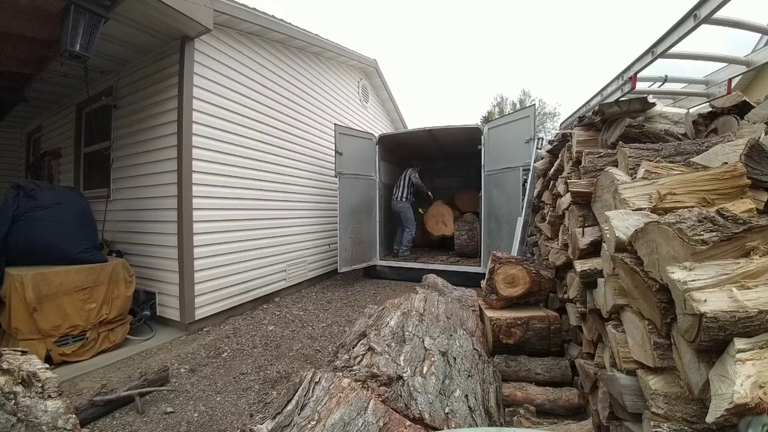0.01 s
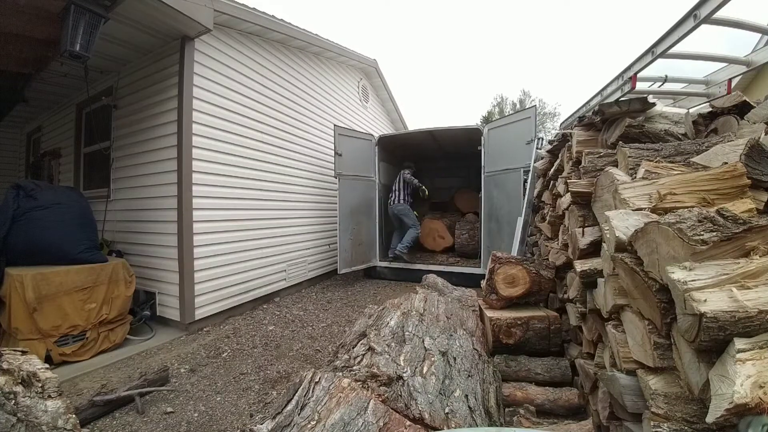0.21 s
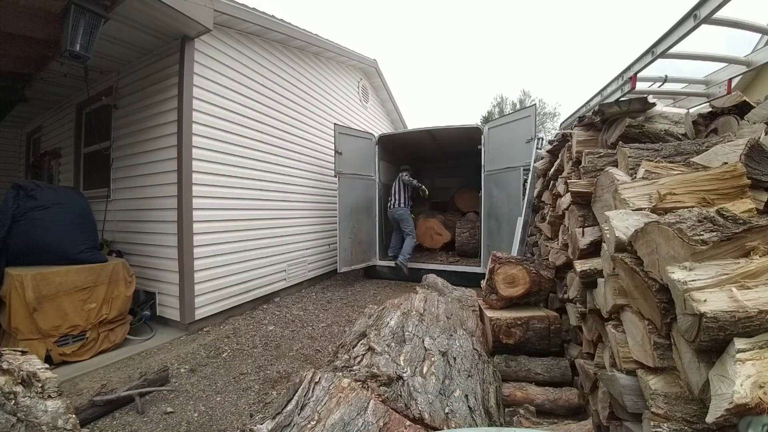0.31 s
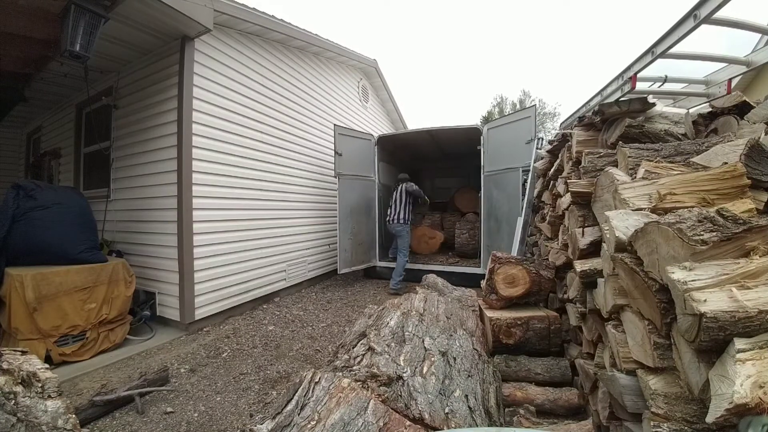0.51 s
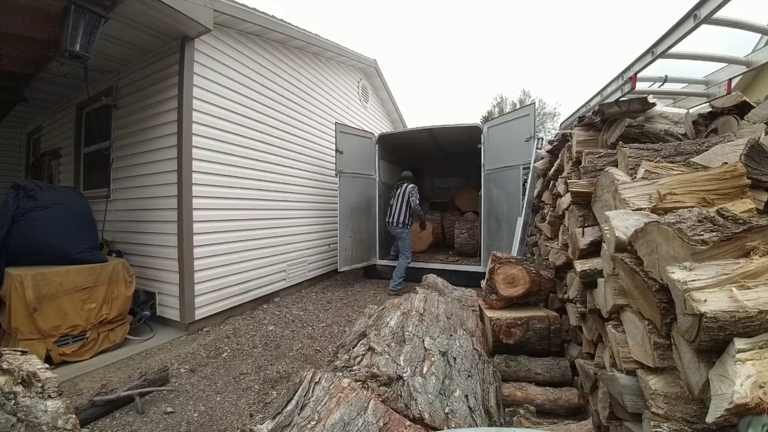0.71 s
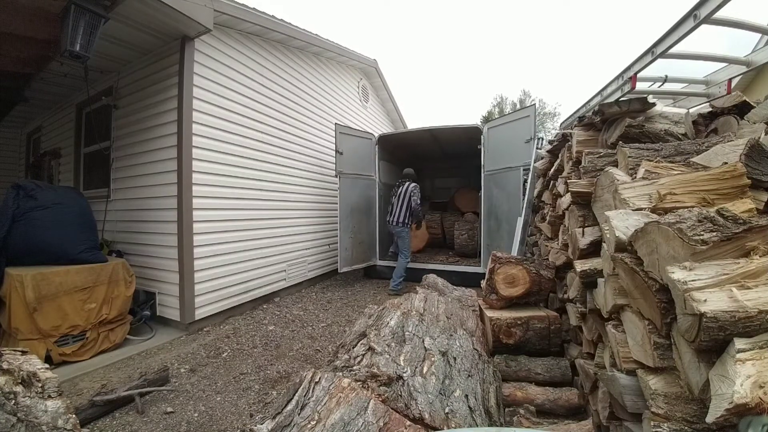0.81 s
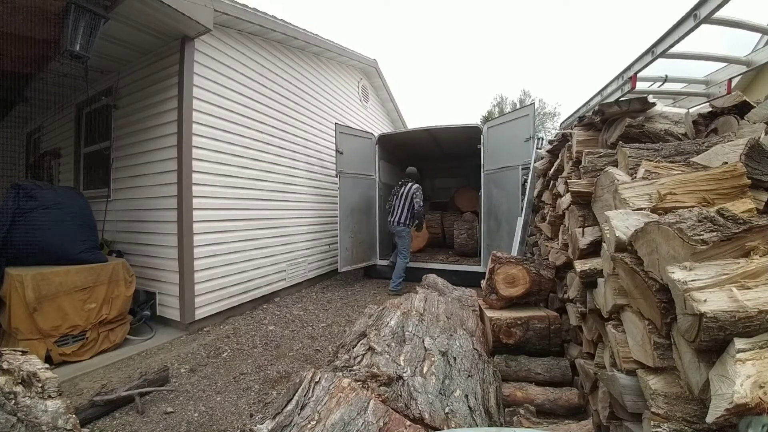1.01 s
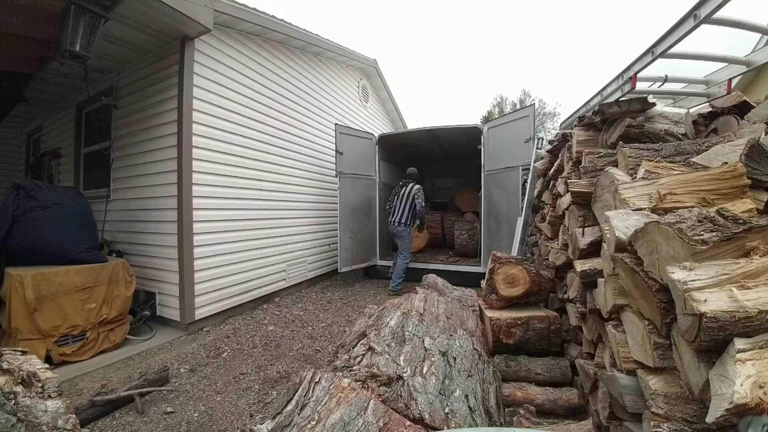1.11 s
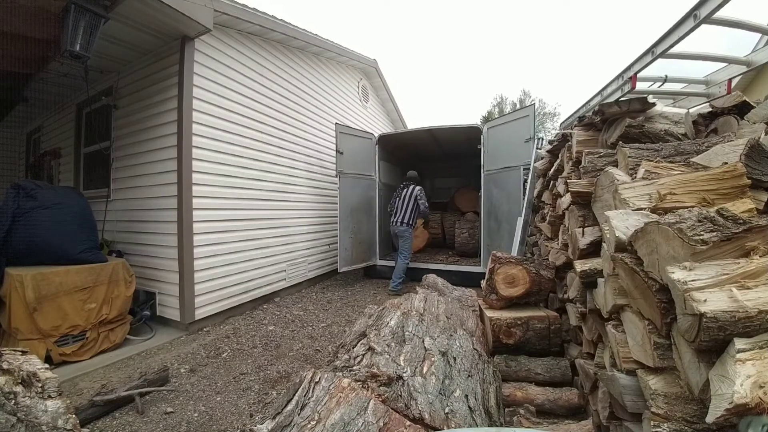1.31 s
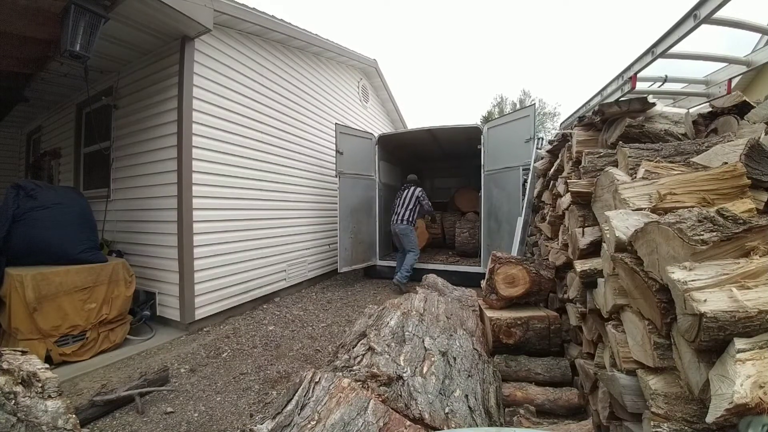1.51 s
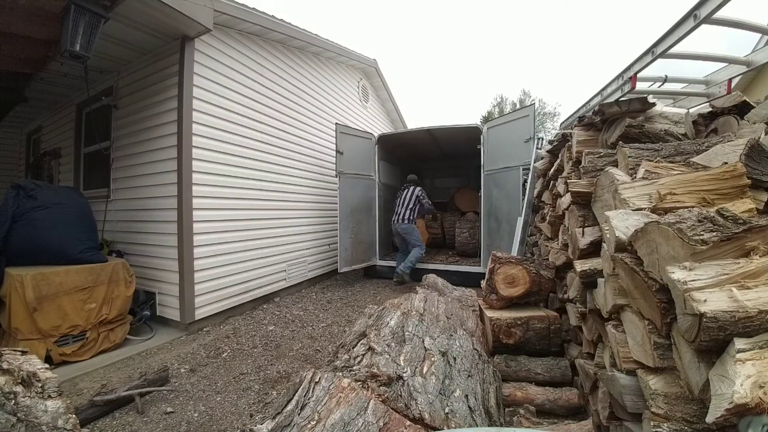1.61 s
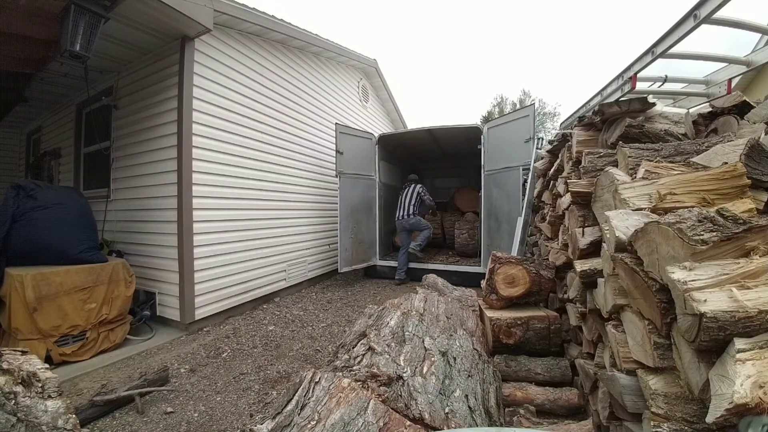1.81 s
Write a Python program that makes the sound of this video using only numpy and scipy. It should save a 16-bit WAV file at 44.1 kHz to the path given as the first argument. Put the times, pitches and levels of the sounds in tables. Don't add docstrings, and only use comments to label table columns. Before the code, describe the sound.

Heavy log knocks and scrapes, thuds onto an echoing trailer floor, rumbles, thuds once more, quiets

```python
import sys
import numpy as np
from scipy import signal
from scipy.fft import rfft, irfft, next_fast_len
from scipy.io import wavfile

SR = 44100
rng = np.random.default_rng(int(sys.argv[2]) if len(sys.argv) > 2 else 0)


def boost_factor(decibels):
    exponent = np.asarray(decibels, float) / 20
    return 10 ** exponent


def digitize_waveform(pressure):
    field = np.atleast_2d(pressure).T
    bounded = np.clip(field, -1, 1)
    quanta = np.round(bounded * 32767).astype(np.int16)
    wavfile.write(sys.argv[1], SR, quanta)


N = 81585

# (frequency [Hz], width [Hz], level [dB])
BODY_MODES = [(176, 42, -11.5), (207, 34, 11), (294, 70, -3.5), (393.3, 23.4, 6), (431, 30, -19.5),
              (637.5, 22, 0.5), (797, 42, -17.5), (915, 18.3, -5), (1200, 23, -41.5), (1375, 12, -21.5),
              (1492, 25, -24.5), (1814, 10, -14), (1934, 19, -14.5), (2570, 18, -58)]


def rms_one(x):
    return x / np.sqrt(np.mean(x ** 2) + 1e-20)


def butter(x, order, hz, kind):
    return signal.sosfilt(signal.butter(order, hz, kind, fs=SR, output="sos"), x)


def colour(x, points):
    edges = 32 * 2 ** np.arange(0, 9.3, 0.5)
    hz, db = np.transpose(points)
    total = 0
    for k, (lo, hi) in enumerate(zip(edges, edges[1:])):
        log_centre = np.log(lo * hi) / 2
        gain = boost_factor(np.interp(log_centre, np.log(hz), db))
        total = total + (-1) ** k * gain * butter(x, 2, [lo, hi], "band")
    return rms_one(total)


def resonance(x, hz, width):
    r = np.exp(-np.pi * width / SR)
    gain = (1 - r * r) / 2
    return signal.lfilter([gain, 0, -gain], [1, -2 * r * np.cos(2 * np.pi * hz / SR), r * r], x)


def double_resonance(x, hz, width):
    return resonance(resonance(x, hz, width), hz, width)


def grains(rate, spread_db):
    size = boost_factor(spread_db * np.minimum(rng.exponential(1, N), 5)) * rng.choice([-1, 1], N)
    return size * (rng.random(N) < rate / SR) + 1e-18


def since(s):
    return np.maximum(np.arange(N) / SR - s, 0)


def burst(s, rise, t60):
    t = since(s)
    return (1 - np.exp(-t / abs(rise))) * boost_factor(-60 * t / abs(t60))


def body(x):
    modal_db = -7
    rings = 0
    for k, (hz, width, db) in enumerate(BODY_MODES):
        rings = rings + (-1) ** k * boost_factor(db / 2) * resonance(x, hz, max(width, 10))
    direct = butter(x, 1, 3000, "low")
    return rms_one(rms_one(direct) + boost_factor(modal_db) * rms_one(rings))


def taps(rows, offset_db, cycles):
    out, t = np.zeros(N + 4000), np.arange(4000) / SR
    for s, db, hz in rows:
        start = int(s * SR)
        ring = np.sin(2 * np.pi * hz * t) * np.exp(-t * hz / cycles)
        out[start:start + len(t)] += boost_factor(db + offset_db) * ring
    return out[:N]


def background():
    # (frequency [Hz], level [dB per Hz])
    air_spectrum = [(35, -27), (60, 11.5), (180, -18.5), (536, -22.5), (1800, -27), (2610, -29.5),
                    (3070, -29.5), (6040, -33), (15700, -39)]
    air_db, hum_db, hum_hz, hum_width_hz = -45.5, -38.5, 52.4, 13
    tone = np.sqrt(2) * np.sin(2 * np.pi * hum_hz * np.arange(N) / SR)
    waver = rms_one(resonance(rng.standard_normal(N), hum_hz, hum_width_hz))
    air = butter(colour(rng.standard_normal(N), air_spectrum), 2, 80, "high")
    return boost_factor(air_db) * rms_one(air) + boost_factor(hum_db) * (tone + 0.11 * waver)


def box(x):
    t60_s, cut_hz = 0.44, 1250
    size = next_fast_len(N + SR)
    z = np.exp(-2j * np.pi * np.arange(size // 2 + 1) / size)
    dull, answer = np.exp(-2 * np.pi * cut_hz / SR), 0
    absorption = (1 - dull) / (1 - dull * z)
    for k, lag in enumerate([487, 613, 739, 857, 991, 1123, 1291, 1447]):
        loop = boost_factor(-60 * lag / SR / t60_s) * absorption * z ** lag
        answer = answer + (-1) ** k * loop / (1 - loop)
    return irfft(rfft(x, size) * answer, size)[:N]


def flecks(x):
    scrape_s, scrape_db, from_hz = 0.1075, -31, 6300
    fleck_db, fleck_gap_s = -8.5, 0.8
    t, late = np.arange(N) / SR, np.roll(x, 90)
    hiss = butter(rng.standard_normal(N), 6, from_hz, "high")
    out = boost_factor(scrape_db) * hiss * burst(scrape_s, 0.002, 0.07)
    for hz in np.sqrt(np.linspace(4500 ** 2, 15500 ** 2, num=12)):
        times = rng.uniform(0, 1, 6)[:, None] * 6 * fleck_gap_s
        windows = np.exp(-((t - times) / 0.011) ** 2).sum(axis=0)
        out = out + boost_factor(fleck_db) * double_resonance(late, hz, 900) * windows
    return out


def latch():
    # (frequency [Hz], width [Hz], level [dB])
    latch_modes = [
        (2470, 140, 0),
        (4150, 200, -6),
        (5400, 160, -5),
        (1150, 160, -4),
    ]
    first_s, period_s, t60_s = 1.291, 0.1035, 0.16
    first_db, loss_db = -50, 0.5
    source, rings, chatter = grains(2700, 2.2), 0, 0
    for hz, width, db in latch_modes:
        rings = rings + boost_factor(db) * rms_one(double_resonance(source, hz, width))
    for k in range(4):
        chatter = chatter + boost_factor(first_db - loss_db * k) * burst(first_s + period_s * k, 0.0034, t60_s)
    return rings * chatter


def scrapes():
    # (time [s], level [dB], rise [s], t60 [s])
    scrape_events = [(.0, -41.5, 0.00054, 1), (0.109, -29.5, 0.00071, 0.4), (0.166, -31.5, 0.0015, 0.54),
                     (0.21, -30, 0.0018, 0.45), (0.2846, -30.5, 0.001, 0.51), (0.373, -34, 0.01, 0.66),
                     (0.458, -33.5, 0.003, 0.32), (.505, -35.5, 0.014, 0.66), (0.651, -33.5, 0.012, 0.19),
                     (0.7507, -42.5, 0.00042, 0.21), (0.784, -34.5, 0.0029, 0.7),
                     (0.808, -37.5, 0.0027, 0.73), (.883, -35, 0.004, 0.94), (.918, -30.5, 0.0035, 0.26),
                     (.985, -35, 0.0084, 0.34), (1.068, -34, 0.005, 0.16), (1.135, -48.5, 0.0061, 1),
                     (1.292, -47.5, 0.0028, 0.14), (1.394, -47.5, 0.014, 0.37), (1.495, -49, 0.0064, 0.25),
                     (1.589, -49, 0.0065, 0.14)]
    # (frequency [Hz], level [dB per Hz])
    grit_spectrum = [(1760, -1), (3000, 7), (4070, -13.5), (4430, -4), (13000, -4.5), (15000, -8.5),
                     (15800, -10)]
    power = sum((boost_factor(db) * burst(s, rise, t60)) ** 2 for s, db, rise, t60 in scrape_events)
    grit = butter(colour(grains(7500, 1.5), grit_spectrum), 3, 2300, "high")
    return np.sqrt(power) * rms_one(grit)


def chafes():
    # (time [s], level [dB], centre [Hz], t60 [s])
    rasp_events = [(0.05, -30, 1600, 0.12), (0.057, -23, 940, 0.058), (0.074, -39, 910, 0.46),
                   (0.217, -28, 1480, 0.1), (.255, -25.5, 2980, 0.1), (0.27, -34.5, 2820, 0.27),
                   (.463, -40.5, 9000, 0.18), (0.798, -27.5, 1870, 0.18), (.808, -44, 5185, .12),
                   (0.894, -26.5, 2440, 0.13), (0.985, -36, 684, 0.19), (.99, -34, 731.5, 0.3),
                   (1.425, -47, 1300, 0.5), (1.45, -48, 1000, 0.22)]
    # (time [s], level [dB], centre [Hz], t60 [s])
    further_chafe_events = [(.113, -42, 14400, .4), (.214, -39, 5800, .15), (.288, -41, 10500, .2),
                            (.789, -42, 14500, .4), (.885, -46, 14500, .2), (1.003, -43, 10800, .35),
                            (1.07, -42, 10500, .25)]
    source, out = grains(8000, 0.79), 0
    for s, db, hz, t60 in [*rasp_events, *further_chafe_events]:
        width = 18.0 * np.sqrt(hz)
        out = out + boost_factor(db) * burst(s, 0.002, t60) * rms_one(double_resonance(source, hz, width))
    return out


def ticks():
    # (time [s], peak level [dB], centre [Hz])
    tick_events = [(0.052, -17, 1880), (0.06, -6.5, 1520), (0.061, -20, 925), (0.07, -13.5, 1040),
                   (0.084, -14, 1060), (0.111, -25, 2700), (0.164, -19, 2650), (0.194, -35, 2690),
                   (0.196, -17.5, 800), (0.288, -24, 851), (0.463, -30, 1100), (0.672, -15, 880),
                   (0.751, -16, 870), (0.806, -35, 2000), (0.895, -10, 1450), (0.992, -11, 720),
                   (0.996, -23, 760), (1.071, -10, 824), (1.25, -35, 853), (1.725, -50, 730)]
    return taps(tick_events, offset_db=-9, cycles=2.4)


def roll():
    # (time [s], level [dB])
    roll_weight = [(0.0, -42), (0.158, -49), (0.246, -26.5), (0.39, -25), (0.556, -29.5), (0.674, -39.5),
                   (0.906, -34), (1.04, -27.5), (1.092, -26), (1.257, -38), (1.664, -56), (1.85, -56.5)]
    # (frequency [Hz], level [dB per Hz])
    rumble_spectrum = [(53, -75), (90, -8), (147, -4), (323, -6), (535, -10), (842, -12.5), (963, -9.5),
                       (1850, -23), (5000, -34.5), (6500, -68), (11000, -120)]
    rumble_db, boom_db, boom_hz, boom_width_hz = 3.5, 3.5, 62, 61
    s, db = np.transpose(roll_weight)
    weight = boost_factor(np.interp(np.arange(N) / SR, s, db))
    rumble = colour(body(grains(2200, 3)), rumble_spectrum)
    boom = rms_one(double_resonance(rng.standard_normal(N), boom_hz, boom_width_hz))
    return weight * (boost_factor(rumble_db) * rumble + boost_factor(boom_db) * boom)


def thumps():
    # (time [s], peak level [dB], pitch [Hz])
    thump_events = [(0.004, -27.5, 197), (0.135, -28, 132), (0.15, -19, 159), (0.222, -9, 145),
                    (0.305, -15, 277), (0.354, -20, 132), (0.441, -20, 318), (0.477, -17, 316),
                    (0.492, -16.5, 134), (0.519, -16, 235), (0.69, -17.5, 240), (0.904, -15.5, 245),
                    (0.918, -9, 207), (0.972, -13, 210), (1.001, -34, 182), (1.095, -16.5, 129),
                    (1.144, -15.5, 169), (1.24, -20.5, 215), (1.441, -29, 170), (1.509, -27.5, 176),
                    (1.546, -34, 266), (1.726, -29, 312)]
    return taps(thump_events, offset_db=-1.5, cycles=1.43)


def knocks():
    # (time [s], level [dB], brightness [Hz], t60 [s])
    knock_events = [(0, -30.5, 1410, 0.27), (0.022, -38, 1650, 1), (0.05, -47, 1360, 0.13),
                    (0.114, -35.5, 1600, 0.97), (0.124, -27.5, 195, 0.31), (0.196, -22.5, 2000, 0.045),
                    (0.2134, -12, 1050, 0.14), (0.287, -25.5, 870, 0.95), (.33, -33.5, 503, 1),
                    (0.386, -27, 575, 0.32), (0.463, -23.5, 714, 0.24), (0.666, -33, 690, 0.33),
                    (0.889, -25.5, 355, 1), (0.7523, -34.5, 1260, 0.27), (0.789, -37.5, 1400, 0.97),
                    (0.838, -32.5, 1200, 0.9), (.897, -28, 2090, 0.052), (0.977, -27, 670, 0.77),
                    (1.068, -25, 700, 0.21), (1.288, -51, 915, 0.028), (1.534, -34.5, 326, 0.17),
                    (1.601, -47.5, 1800, .2), (1.7254, -37, 650, 0.26), (0.922, -29.5, 790, 0.63),
                    (1.118, -38.5, 724, 1), (1.2, -52, 980, 0.18), (0.577, -34, 1050, 0.34),
                    (0.518, -54, 520, 0.69)]
    rise_s, span = 0.002, 2.5
    source, out = body(grains(12000, 4.9)), 0
    for s, db, hz, t60 in knock_events:
        band = rms_one(butter(source, 2, [hz / span, hz * span], "band"))
        low = butter(band, 1, hz, "low")
        high = band - low
        out = out + boost_factor(db) * (low * burst(s, rise_s, t60) + high * burst(s, rise_s, t60 * 0.49))
    return out


def bumps():
    # (time [s], peak level [dB], pitch [Hz])
    bump_events = [(0.001, -58, 51.3), (0.028, -29, 42.7), (0.066, -41, 52.7), (0.099, -36.5, 68),
                   (0.131, -31, 84.4), (0.146, -51, 109), (.172, -50, 55.4), (0.2151, -10, 65.5),
                   (0.2297, -10, 66.2), (0.292, -13, 62.5), (0.343, -31, 61.6), (0.367, -17.5, 60.6),
                   (0.423, -20, 62.6), (0.482, -13, 63), (0.558, -14.5, 64), (0.658, -17.5, 64),
                   (0.712, -13, 59.6), (0.79, -20.5, 58.3), (0.831, -20, 53.6), (.865, -24, 54.4),
                   (0.898, -9, 57.3), (0.988, -14.5, 52.4), (1.072, -13.5, 59.9), (1.128, -15, 62),
                   (1.175, -19.5, 53.5), (1.206, -16.5, 61), (1.277, -30, 55.6), (1.309, -34.5, 57),
                   (1.332, -24, 54.2), (1.399, -24.5, 52.8), (1.43, -28, 55.6), (1.489, -29, 58),
                   (1.512, -33, 53.4), (1.586, -31, 61)]
    rise_s, fall_s = 0.012, 0.031
    upper_ratio, upper_db = 1.24, -8.5
    out = 0
    for s, db, hz in bump_events:
        t = since(s)
        shape = (1 - np.exp(-t / rise_s)) * np.exp(-t / fall_s)
        lower_mode = np.sin(2 * np.pi * hz * t)
        upper_mode = boost_factor(upper_db) * np.sin(2 * np.pi * hz * upper_ratio * t)
        out = out + boost_factor(db) * shape / shape.max() * (lower_mode + upper_mode)
    return out


def slaps():
    # (time [s], peak level [dB], pitch [Hz], width [s])
    slap_events = [
        (.885, -1.5, 180, .0036),
        (.219, -11, 200, .005),
        (.2325, -12, 170, .004),
        (.899, -16, 200, .006),
        (.239, -12, 140, .004),
    ]
    t, out = np.arange(N) / SR, 0
    for s, db, hz, width in slap_events:
        out = out + boost_factor(db) * np.cos(2 * np.pi * hz * (t - s)) * np.exp(-((t - s) / width) ** 2)
    return out


def drop():
    contact_delays = [0, .002, .0045, .0075, .0095, .012, .016, .019, .022, .026, .031, .037]
    drop_s, drop_db, soft_hz = 0.2137, -22, 2280
    loss_db, luck_db = 1.16, 1.54
    shape = (len(BODY_MODES), len(contact_delays))
    strengths = rng.normal(0, luck_db, shape) - loss_db * np.arange(shape[1])
    signs = rng.choice([-1, 1], shape)
    places = ((drop_s + np.array(contact_delays)) * SR).astype(int)
    out = 0
    for (hz, width, db), strength, sign in zip(BODY_MODES, strengths, signs):
        clicks = np.full(N, 1e-18)
        clicks[places] = sign * boost_factor(drop_db + db + strength) * SR / (2 * np.pi * width)
        out = out + resonance(clicks, hz, width * 1.5)
    return butter(out, 4, soft_hz, "low")


def scene():
    hits = knocks() + drop() + chafes() + ticks() + latch()
    echo = boost_factor(-17.5) * box(hits)
    floor = slaps() + thumps() + bumps()
    mid = hits + echo + floor + roll() + scrapes() + background()
    side = flecks(mid)
    return np.array([mid + side, mid - side])


def band_limit(x):
    return signal.sosfilt(signal.butter(12, 15830, fs=SR, output="sos"), x)


def record(dry):
    x = butter(dry, 3, 33, "high")
    rounded = 0.9 * np.tanh(x / 0.9)
    top_cut = signal.ellip(14, 0.5, 80, 15820, fs=SR, output="sos")
    return band_limit(signal.sosfilt(top_cut, rounded))


dry = scene()
out = record(dry)
digitize_waveform(out)
```